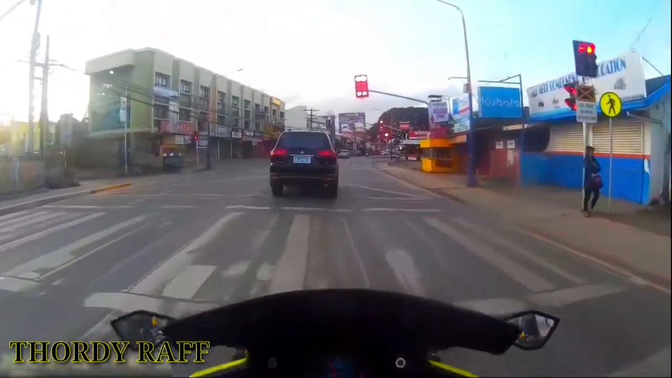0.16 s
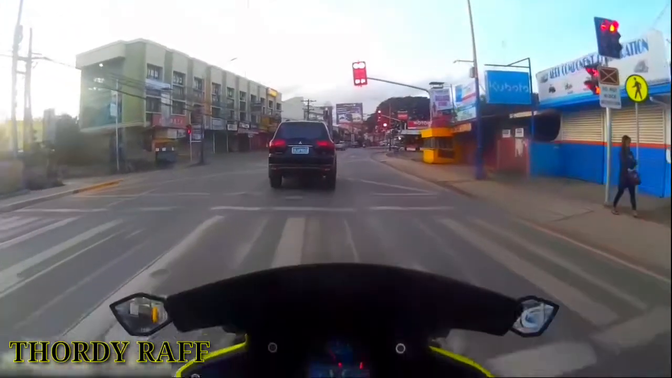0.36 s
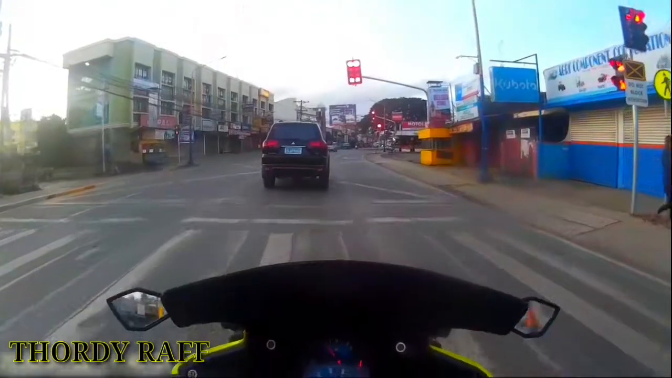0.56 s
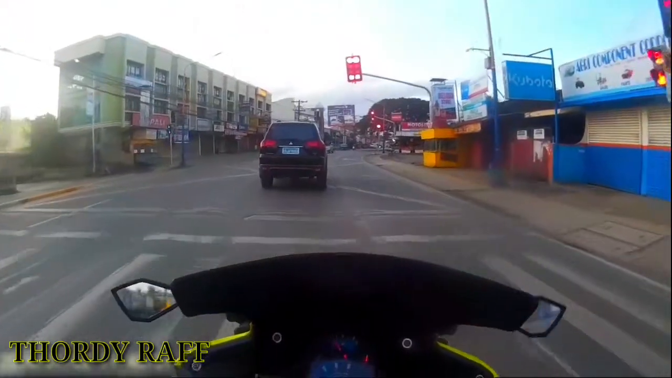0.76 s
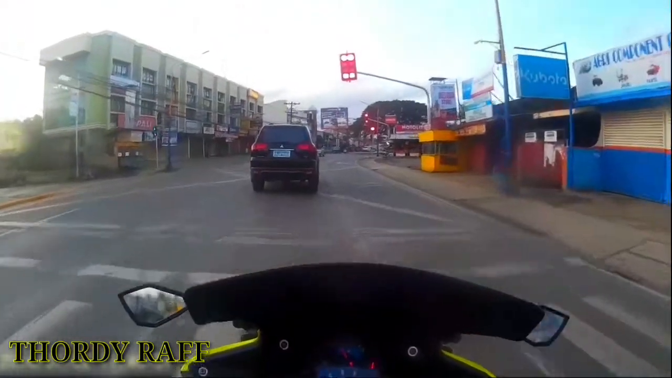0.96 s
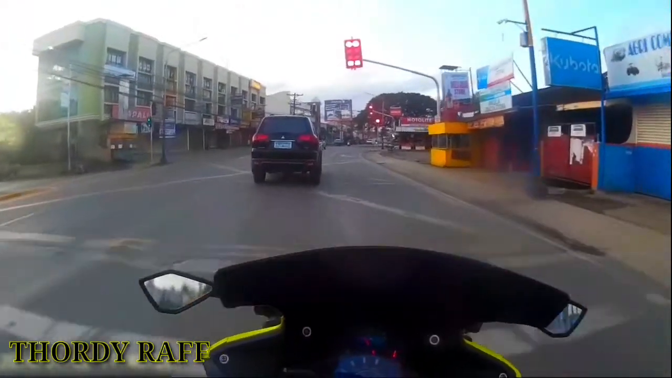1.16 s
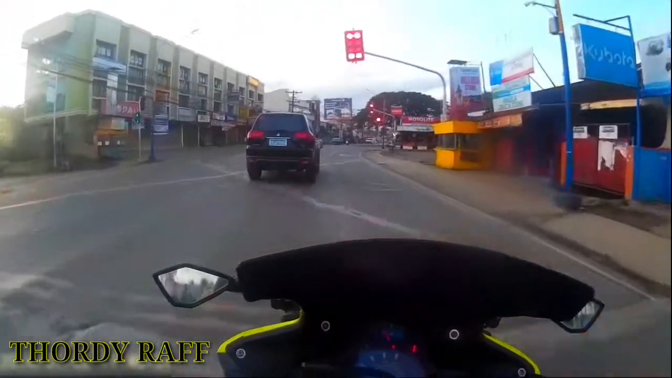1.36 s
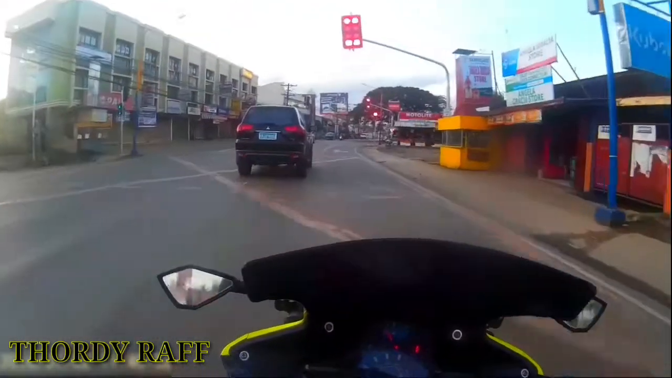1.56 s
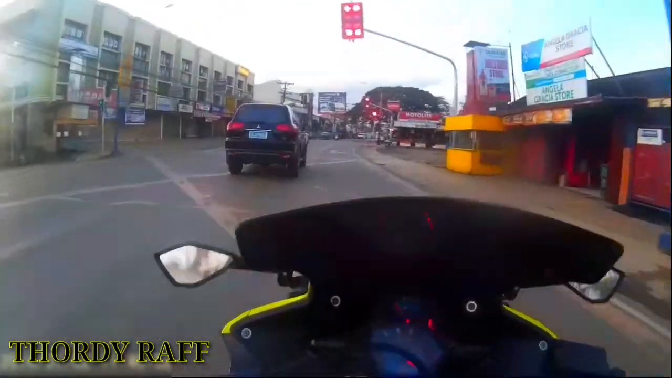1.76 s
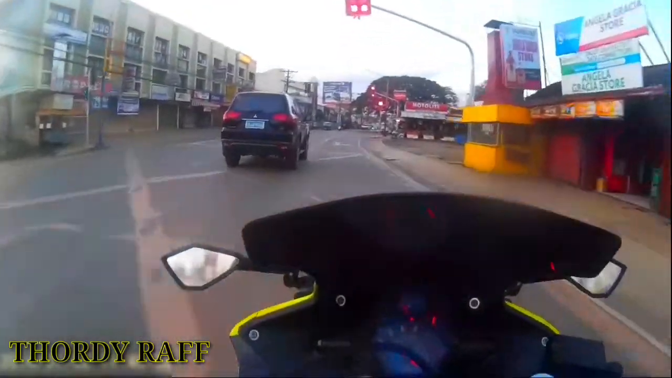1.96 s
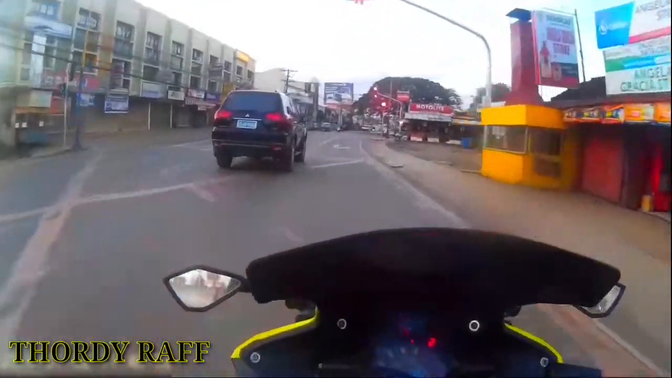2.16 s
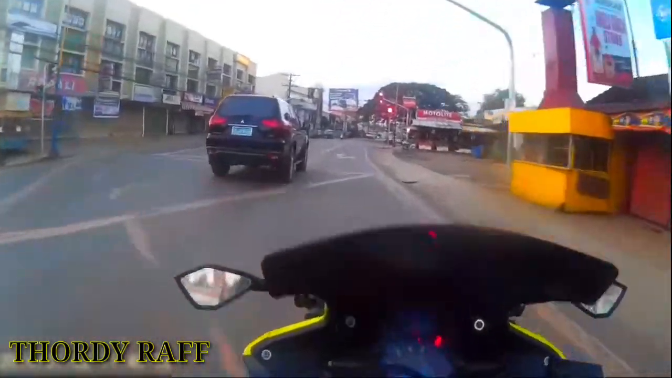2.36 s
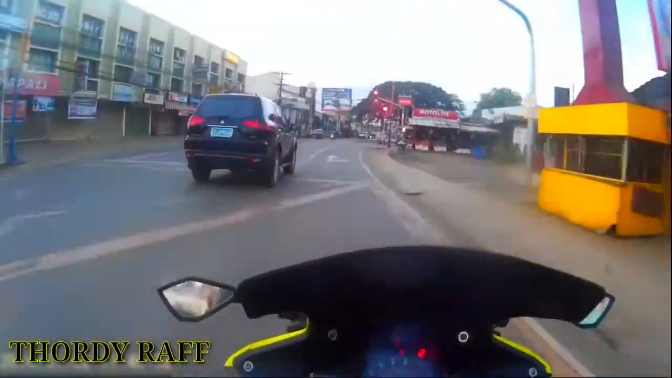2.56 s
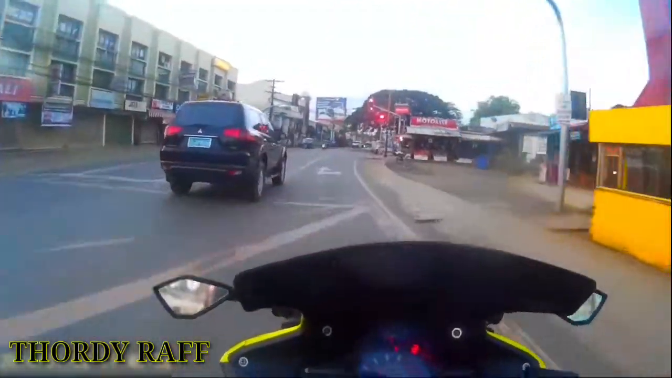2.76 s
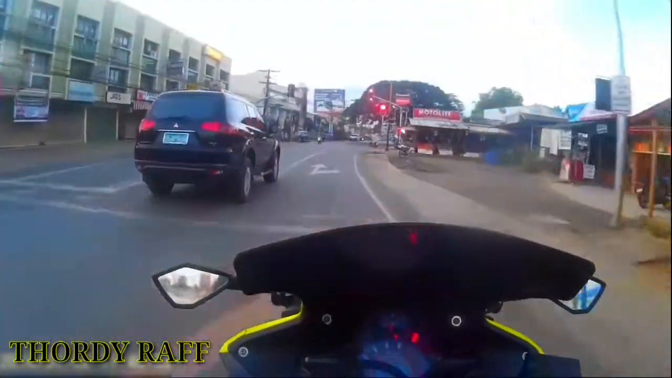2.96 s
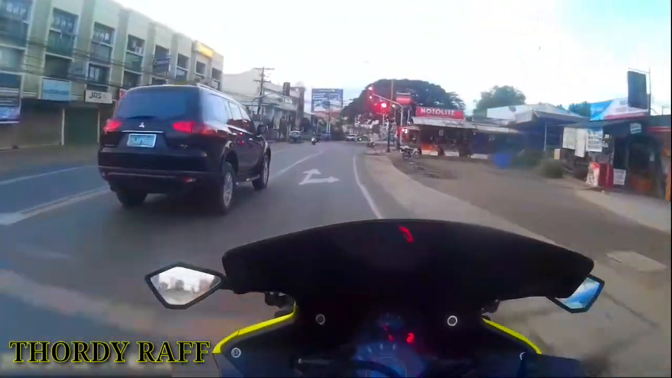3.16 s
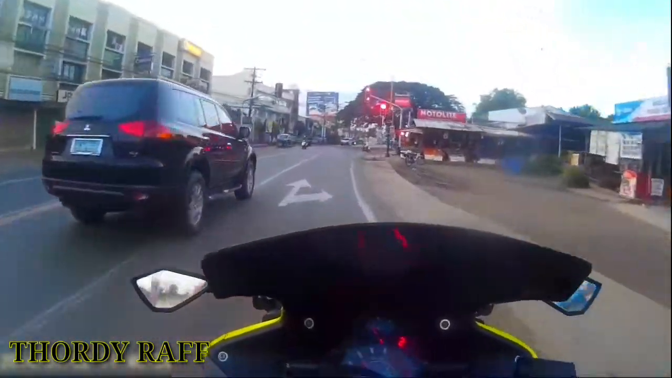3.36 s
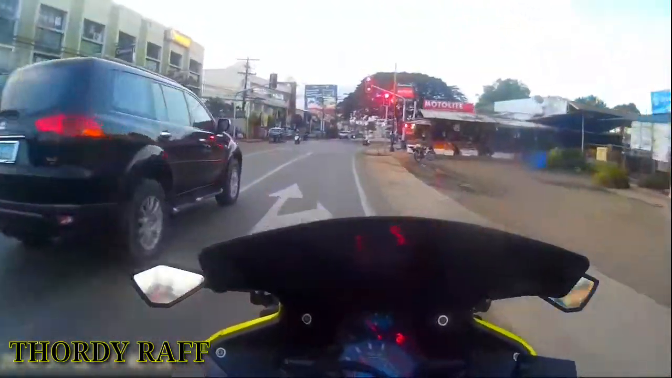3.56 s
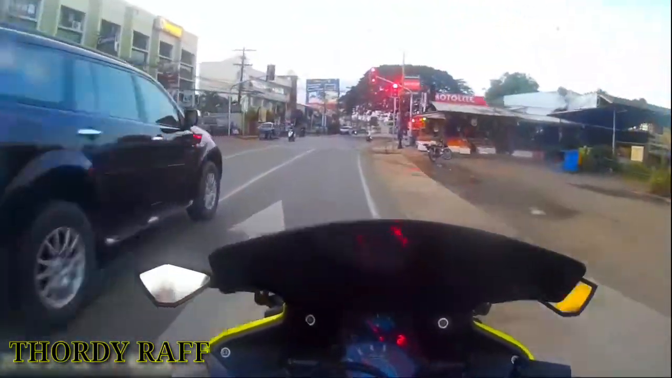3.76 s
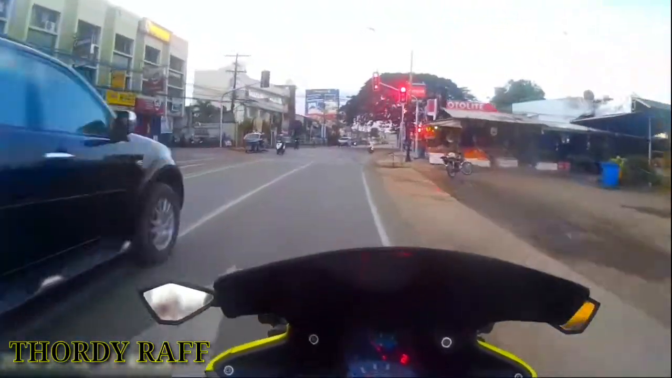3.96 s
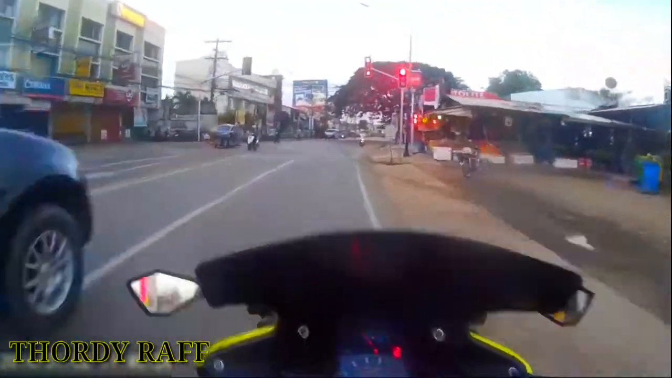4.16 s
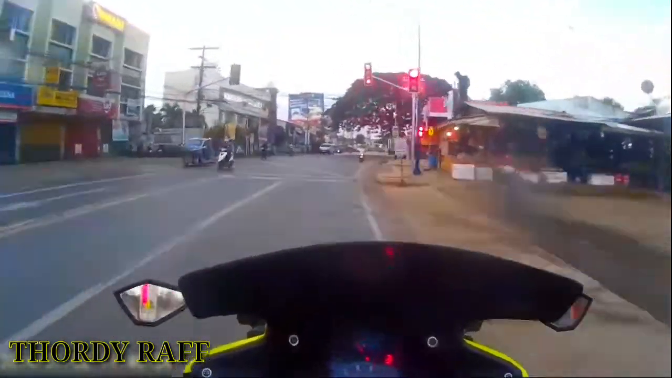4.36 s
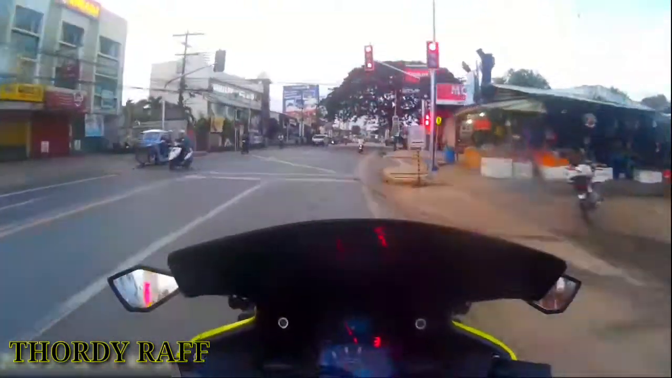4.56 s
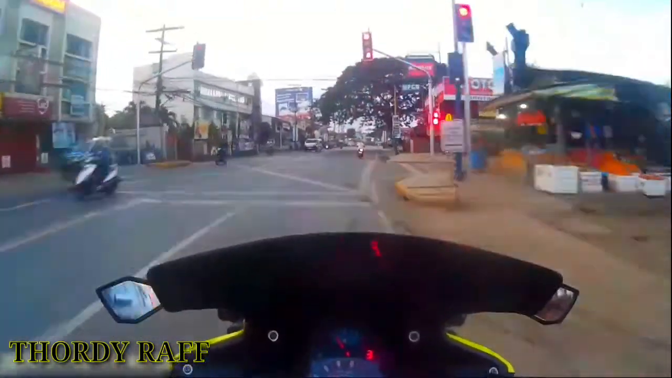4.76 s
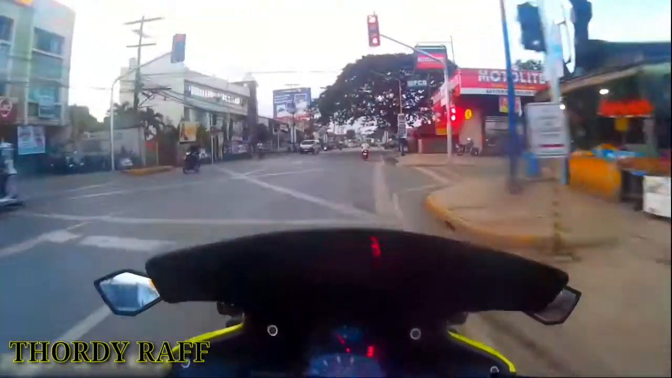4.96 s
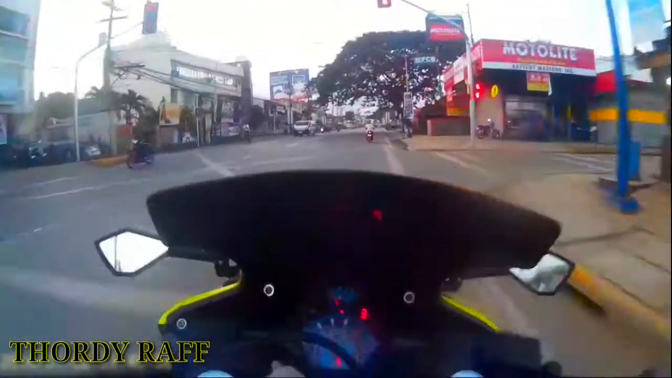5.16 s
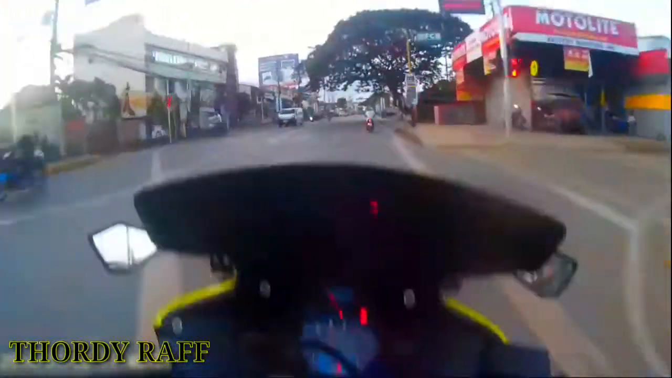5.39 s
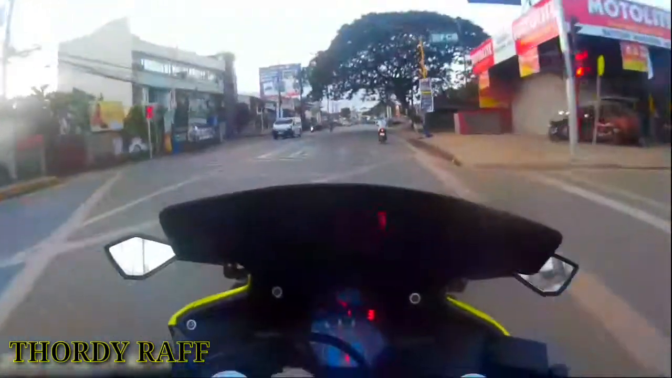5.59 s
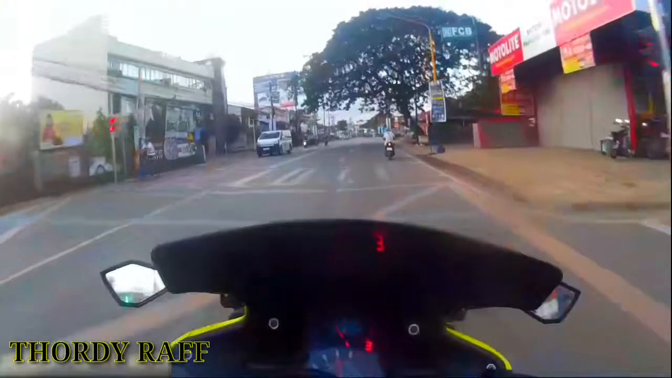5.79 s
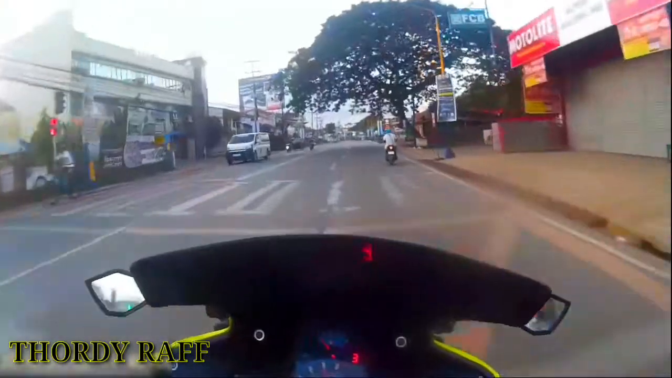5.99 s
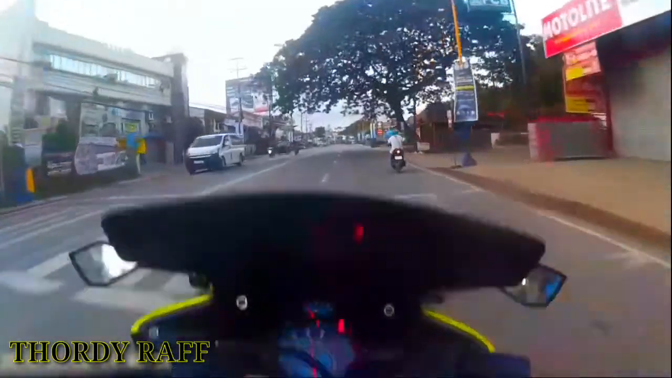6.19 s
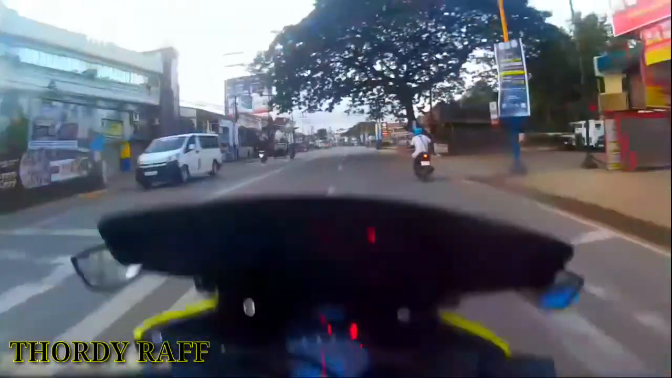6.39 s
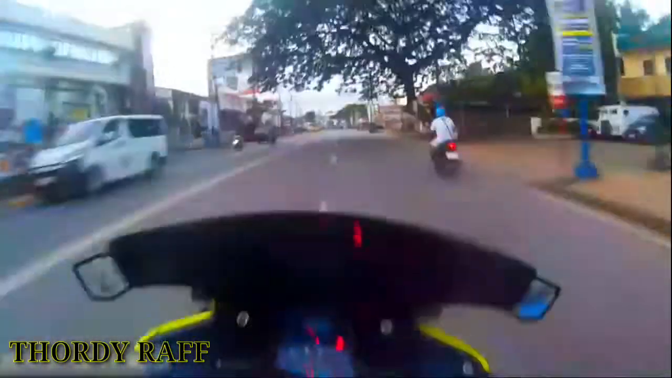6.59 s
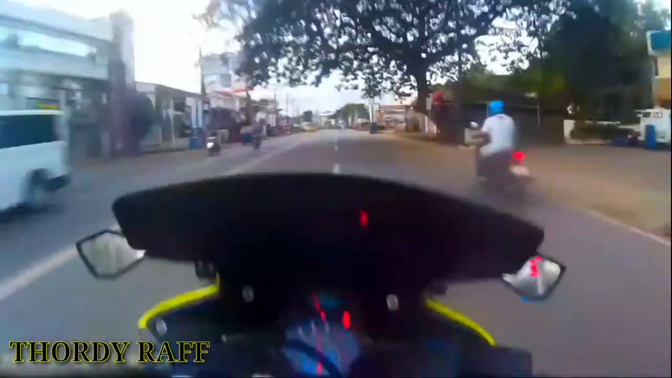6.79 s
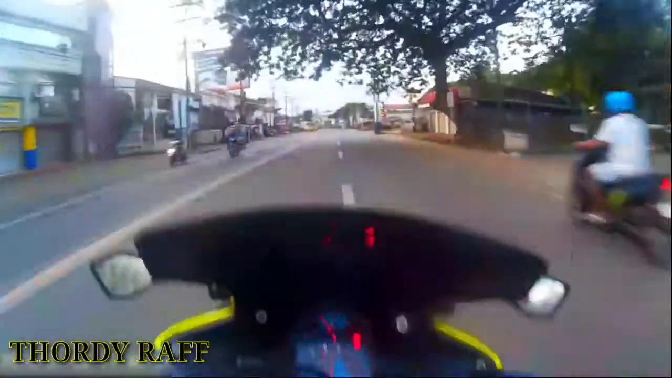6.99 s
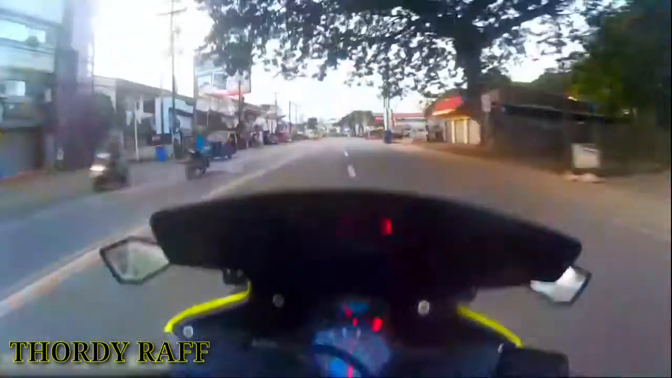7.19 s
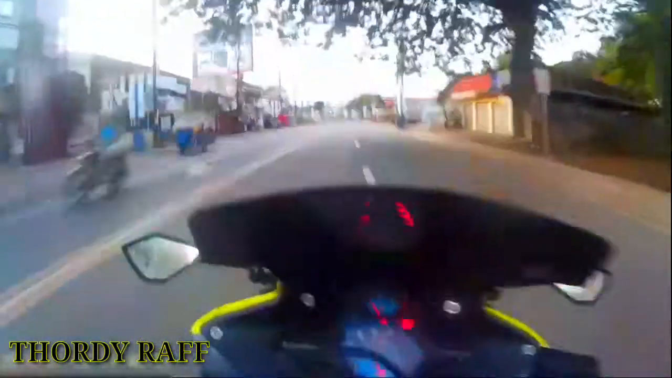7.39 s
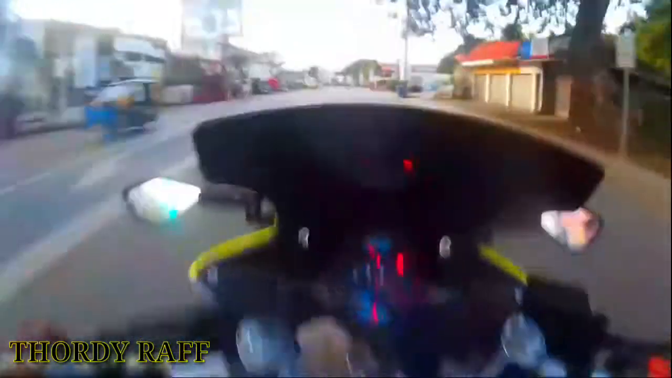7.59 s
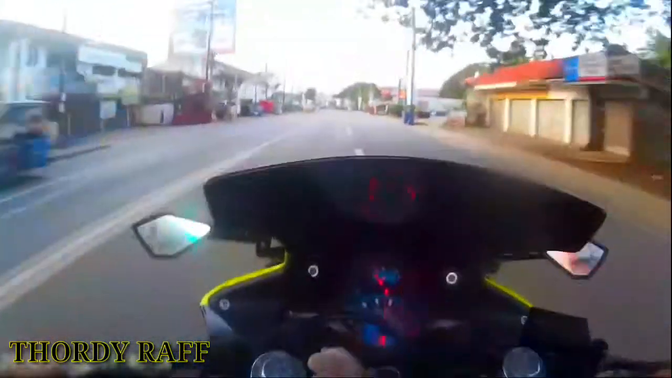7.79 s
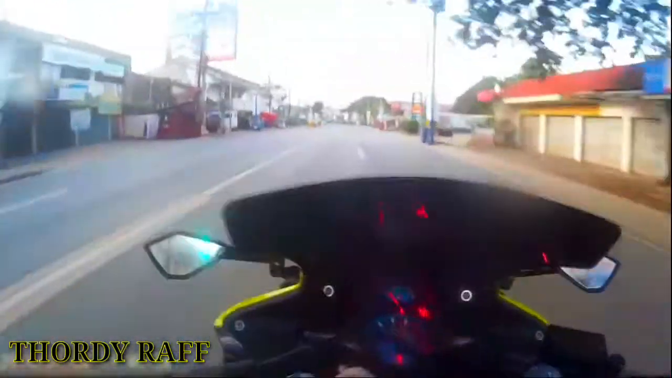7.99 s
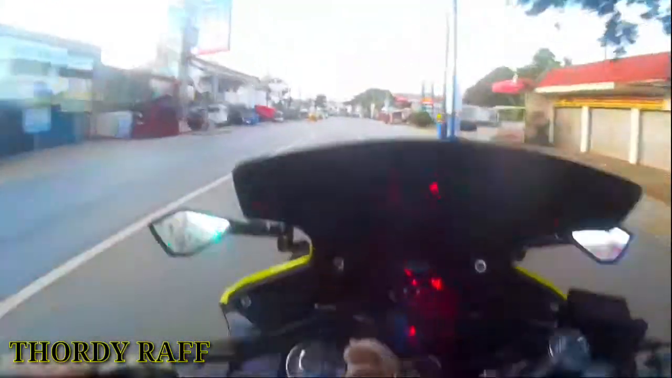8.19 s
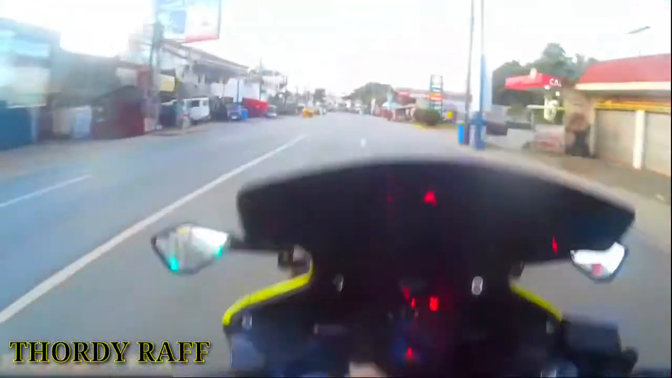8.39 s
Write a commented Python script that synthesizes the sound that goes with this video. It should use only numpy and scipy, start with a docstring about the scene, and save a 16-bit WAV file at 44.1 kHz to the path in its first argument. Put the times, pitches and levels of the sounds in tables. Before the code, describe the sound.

Onboard motorcycle ride outdoors: quiet hiss and low engine at first, then a swift swelling pull, a brief throttle cut, another climb, a second shift, and a longer slower climb before a last quick shift. The enclosed microphone makes the motor buzzy, nasal and muffled, while lumpy wind rumble and sudden bassy bumps grow towards the end.

```python
"""On the road: a single-cylinder motorcycle pulls away and shifts up through the gears.
It is heard through a camera in a case on the rider. Each firing thumps as a sum of exhaust tones;
the crank hums, and noise bursts and overtones rattle the case, which rings at fixed pitches.
Wind is low, lumpy noise that grows along the ride, with sudden slaps; the recorder adds a soft hiss."""
import sys
import numpy as np
from scipy import signal
from scipy.fft import rfft, irfft, next_fast_len
from scipy.io import wavfile
from scipy.ndimage import uniform_filter1d

SR = 44100
rng = np.random.default_rng(int(sys.argv[2]) if len(sys.argv) > 2 else 0)


def transcribe(u):
    """Save the signal u as a 16-bit wav file named by the first command-line argument.

    u: samples, shape (n,) or (channels, n), limited to [-1, 1]; the rate is SR.
    q: integer samples, one column per channel.
    """
    v = np.clip(np.atleast_2d(u).T, -1, 1)
    q = np.round(v * 32767).astype(np.int16)
    wavfile.write(sys.argv[1], SR, q)


N = 372204  # length in samples

# Strength of the wind, which grows with road speed: t/s, relative level/dB
WIND_STRENGTH = [(0.0, -46.5), (0.8, -47), (1.15, -44.5), (2.1, -43), (2.9, -40), (3.4, -37), (4.2, -34),
                 (4.95, -32), (5.3, -29), (5.65, -32), (6.3, -30), (7.0, -26.5), (7.6, -27.5),
                 (7.85, -23.5), (8.05, -30), (8.44, -27.5)]
RIDE_MIDDLE_S = 5.2  # slow changes of tone along the ride are neutral here


def gain_of(db):
    """Turns decibels into a factor for the signal."""
    return 10 ** (np.asarray(db) / 20)


def evened(x):
    """Scales a signal to an average strength (rms) of 1."""
    return x / np.sqrt(np.mean(x ** 2) + 1e-20)


def read(points, hz):
    """Reads a curve over frequency, with straight lines on a logarithmic pitch scale."""
    f, value = np.transpose(points)
    return np.interp(np.log(hz + 1), np.log(f + 1), value)


def columns(rows):
    """Turns each column of a table over time into one value per sample."""
    s, *values = np.transpose(rows)
    return [np.interp(np.arange(N) / SR, s, v) for v in values]


def coloured(x, gain):
    """Filters x by a gain given as a function of Hz."""
    size = next_fast_len(N + 8192)
    spectrum = rfft(x, size) * gain(np.fft.rfftfreq(size, 1 / SR))
    return irfft(spectrum, size)[:N]


def drift(hz):
    """Random wandering of rms 1, with changes mostly slower than hz."""
    noise = rng.standard_normal(N)
    return evened(coloured(noise, lambda f: (f > .5) / (1 + (f / hz) ** 4)))


def per_firing(turns):
    """One random number for each firing, joined by straight lines."""
    draws = rng.standard_normal(1000)
    return np.interp(turns, np.arange(len(draws)), draws)


def overtones(turns, orders, gain, late, waver_db):
    """Adds multiples of the firing rate, each with a gain curve, a lag in radians and its own slow wavering."""
    n, out = np.arange(N), np.zeros(N)
    coarse = n[::64]  # the curves are worked out at every 64th sample
    for k in orders:
        # a new random level every 8 firings
        waver = np.interp(turns[::64] / 8, np.arange(300), rng.standard_normal(300))
        size = np.interp(n, coarse, gain(k) * gain_of(waver_db * waver))
        lag = np.interp(n, coarse, late(k))
        out += size * np.cos(2 * np.pi * k * turns - lag)
    return np.sqrt(2) * out


def recorder_hiss(dry):
    """Shaped noise; gain control presses it down a little when the scene is loud."""
    # Tone of the hiss: f/Hz, relative level/dB per Hz
    hiss_tone = [(1470, -24), (2500, -1.5), (3470, -3.5), (5070, -3.5), (6560, -2.5), (8560, -4),
                 (11400, -2.5), (13400, -5.5), (15400, -21)]
    hiss = gain_of(-55) * evened(coloured(rng.standard_normal(N), lambda f: gain_of(read(hiss_tone, f))))
    power_db = 10 * np.log10(uniform_filter1d(dry[0] ** 2, 8000) + 1e-12)
    pressed_db = .1 * np.maximum(power_db + 44.0, 0)
    return hiss * gain_of(0.2 * drift(12) - pressed_db)


def wind_rumble():
    """Low turbulence: filtered noise whose strength wanders, so it comes in lumps."""
    # Tone of the wind: f/Hz, relative level/dB per Hz
    wind_tone = [(20, 15), (30, -13.5), (45, 4), (62, 10), (85, 3.5), (120, 3.5), (160, -2), (250, -4.5),
                 (450, -6), (700, -74)]
    level_db, = columns(WIND_STRENGTH)
    lumps = rng.standard_normal(N) * gain_of(0.26 * drift(38) + 0.34 * drift(5.2))
    return gain_of(level_db + 2.5) * evened(coloured(lumps, lambda f: gain_of(read(wind_tone, f))))


def slaps():
    """Hard gusts and jolts slap the microphone: each is a low thud with a puff of noise."""
    # The slaps: t/s, level of the thud/dB, f/Hz
    slap_list = [(5.123, -22, 59.7), (5.399, -22, 92.4), (5.439, -22.5, 44.9), (5.799, -27, 61.5),
                 (6.119, -30, 92.4), (6.34, -18.5, 56.64), (6.37, -22, 59.96), (6.729, -28, 117.5),
                 (7.449, -21, 70.2), (7.549, -20, 80), (7.693, -23, 84.04), (7.859, -22.5, 61.5),
                 (8.219, -26, 124)]
    peak_s = 0.013  # a slap swells until this time, then fades
    out = np.zeros(N)
    t = np.arange(round(.15 * SR)) / SR
    low_pass = signal.butter(4, 900, fs=SR, output="sos")
    puffs = evened(signal.sosfilt(low_pass, rng.standard_normal((len(slap_list), len(t)))))
    for (s, db, hz), puff in zip(slap_list, puffs):
        swell = (t / peak_s) * np.exp(1 - t / peak_s)
        slap = gain_of(db) * (np.sin(2 * np.pi * hz * t) + 0.27 * puff) * swell
        part = out[round(s * SR):][:len(t)]
        part += slap[:len(part)]
    return out


def throttle_shut():
    """Gear changes: 1 while the throttle is shut, 0 under power, with ramps between."""
    # The gear changes: throttle starts to shut at t/s, stays shut for/s, reopens over/s
    shifts = [(2.035, 0.11, 0.18), (4.115, .07, 0.075), (7.79, 0.034, 0.058)]
    close_s = 0.017
    t = np.arange(N) / SR
    return sum(np.interp(t - s, [0, close_s, close_s + hold, close_s + hold + reopen], [0, 1, 1, 0])
               for s, hold, reopen in shifts)


def flares():
    """The rear wheel skips and the engine flares: extra speed and clatter, each flare a short bell curve."""
    # Flares over bumps: t/s, extra firing rate f/Hz, extra clatter level/dB
    flare_list = [(1.74, 0.57, 2), (4.56, 0.91, 1.5), (5.28, 3.1, 3.5), (6.37, 4.62, 5)]
    t = np.arange(N) / SR
    return sum(np.outer([hz, db], np.exp(-((t - s) / .045) ** 2)) for s, hz, db in flare_list)


def case_gain(hz):
    """The camera case rings at fixed pitches; the powers of its steep-sided resonances add."""
    # Resonances of the case: f/Hz, width/Hz, level/dB
    resonances = [(304, 210, 2.5), (566, 300, 3.5), (620, 40, 6), (776, 170, 6), (998, 150, 3.5),
                  (1114, 154, 5.5), (1290, 177, 7.5), (1628, 140, -0.5), (1790, 570, -11), (2087, 250, 0.5),
                  (2612, 310, -15.5), (2960, 204, -10.5), (3336, 266, -9), (3732, 310, -17),
                  (4060, 3700, -28.5), (7600, 1500, -32.5)]
    return np.sqrt(sum((gain_of(db) / (1 + (2 * (hz - f) / width) ** 2)) ** 2
                       for f, width, db in resonances))


def clatter(turns, hz, level_db):
    """Noise that bursts at each firing and, weaker, one crank turn later, ringing the case."""
    # Share of noise in the rattle, less where the overtones rule: f/Hz, level/dB
    noise_share = [(400, -4.5), (600, -7.5), (900, -4.5), (1300, -2), (1800, 1.5), (4000, -0.5)]
    phase = turns + .17  # the knock leads the exhaust pulse by this share of a cycle
    burst = np.exp(-(phase % 1) / 0.097) + 0.61 * np.exp(-((phase + .5) % 1) / 0.51)
    noise = rng.standard_normal(N) * (1 + 1.3 * burst * gain_of(1.8 * per_firing(turns)))
    ring = evened(coloured(noise, lambda f: case_gain(f) * gain_of(read(noise_share, f))))
    # the top brightens with engine speed (dB per Hz) and dulls along the ride (dB per second)
    top = coloured(ring, lambda f: np.clip((f - 2300) / 300, 0, 1) * np.clip((5000 - f) / 800, 0, 1))
    bite_db = 0.1849 * (hz - 56.5) - .5 * (np.arange(N) / SR - RIDE_MIDDLE_S)
    ring = ring + (gain_of(bite_db) - 1) * top
    return gain_of(level_db - 2.0 + 0.33 * drift(14.0)) * ring


def buzz(turns, hz, level_db):
    """Firing knocks reach the case through the frame as overtones, firmer at speed."""
    # How firmly the frame passes the overtones to the case: f/Hz, level/dB
    mount = [(450, -1), (650, -2), (790, 3), (900, -0.7), (1250, 0.5), (2100, -1.3)]
    loose = rng.standard_normal((40, 100))  # the frame shifts each overtone slowly

    def strength(k):
        overtone_hz = k * hz[::64]
        odd_db = -2.5 * (k % 2)  # even multiples, the overtones of the crank turn, are stronger
        return case_gain(overtone_hz) * gain_of(odd_db + read(mount, overtone_hz))

    def lag(k):
        return 1.5 * np.interp(turns[::64] / 36, np.arange(100), loose[k])

    out = overtones(turns, range(8, 40), strength, lag, waver_db=3.2)
    # buffeting loosens the mount, so strong wind weakens the buzz
    wind_db = uniform_filter1d(columns(WIND_STRENGTH)[0], SR // 2)
    shaken_db = .25 * np.maximum(wind_db + 40, 0)
    firmer_db = np.clip(.4 * (hz - 56), -10, 0)
    return gain_of(level_db - shaken_db + firmer_db) * evened(out)


def crank_levels(hz, level_db, shut):
    """The crank's hum and its octave follow the clatter, coloured by the frame, each wavering."""
    # How strongly the frame carries the hum: f/Hz, level/dB
    frame_hum = [(56, -18), (68, -5), (79, 0.5), (92, -6), (104, -4), (115, -6.5), (128, -8.5)]
    # How strongly the frame carries the octave: f/Hz, level/dB
    frame_octave = [(112, -14), (135, -5), (157, -4), (180, -8), (205, -3), (225, 0.5), (258, 0)]
    # How far the crank's tones stand out along the ride: t/s, hum level/dB, octave level/dB
    crank_balance = [(0.0, 3.5, -0.3), (2.1, 1, 0.6), (3.0, .1, 0.1), (4.4, -1.5, -0.5), (5.8, -3, -1.5),
                     (6.8, 5.5, -3), (8.44, -1.5, -4)]
    waver_db = 1.5
    hum_db, octave_db = columns(crank_balance)
    hum_db = hum_db + read(frame_hum, 2 * hz) - 8.0 * shut + waver_db * drift(8.3)
    octave_db = octave_db + read(frame_octave, 4 * hz) - 4.5 * shut + waver_db * drift(6.0)
    return level_db + hum_db, level_db + octave_db


def crank(turns, hum_db, octave_db):
    """The crank turns twice per firing and hums on, more softly, when the throttle is shut."""
    hum = -gain_of(hum_db) * np.sin(2 * np.pi * 2 * turns)
    octave = -gain_of(octave_db) * np.cos(2 * np.pi * 4 * turns)
    return np.sqrt(2) * (hum + octave)


def exhaust(turns, hz, level_db):
    """A steady pulse per firing, weighted by the pipe, which delays tones unevenly around its middle."""
    # What the exhaust pipe lets through: f/Hz, level/dB
    pipe = [(30, -36), (70, -39), (150, 11.5), (220, -4.5), (270, 7.5), (320, 5), (380, 7), (430, 4.5),
            (455, -17), (490, -14), (560, -8.5)]
    # The pulse, uneven as intake and exhaust beat in turn: multiple of the firing rate, level/dB
    pulse = [(1, -24), (3, -25.5), (5, -8), (6, -1.5), (7, 0), (8, -3.5), (9, -4), (10, -7), (11, -23),
             (12, -19.5), (13, -18.5)]
    share_db = {round(k): db for k, db in pulse}
    hz = hz[::64]
    # odd multiples run ahead by lead radians: a weaker beat between two firings, more so at speed
    lead = np.clip(.45 + .045 * (hz - 46), .45, 1.1)
    # the upper multiples gain strength along the ride, in dB per multiple
    tilt_db = 0.67 * (np.arange(0, N, 64) / SR - RIDE_MIDDLE_S)

    def strength(k):
        steps = min(max(k - 6, -2), 2)
        return gain_of(share_db[k] + read(pipe, k * hz) + tilt_db * steps)

    def lag(k):
        return .2 * ((k * hz - 300) / 60) ** 2 - lead * (k % 2)

    out = overtones(turns, share_db, strength, lag, waver_db=0.0)
    return -gain_of(level_db + .4 * per_firing(turns)) * out  # each pulse arrives as a suction


def scene():
    """Adds wind and engine at one microphone; all engine parts share one count of firings."""
    # Pulls and drops between gears: t/s, firing rate f/Hz, relative exhaust level/dB, clatter level/dB
    engine_course = [(0.0, 28.4, -69, -53), (0.73, 39.18, -56, -51.5), (1.01, 44.73, -53.5, -48.5),
                     (1.36, 50.94, -46, -43), (1.5, 53.8, -40.5, -38), (1.62, 55.94, -40.5, -38.5),
                     (1.76, 60.33, -39.5, -37), (2.04, 63.7, -35.5, -32.5), (2.18, 53.5, -32, -39),
                     (2.31, 44.26, -45.5, -43), (2.7, 48.24, -43, -41), (3.0, 51.57, -44, -39.5),
                     (3.2, 54.1, -38, -37.5), (3.67, 59.35, -37, -33), (4.11, 64.28, -34.5, -29),
                     (4.2, 61.9, -38.5, -33), (4.51, 46.48, -39.5, -36.5), (4.75, 48.21, -40.5, -37.5),
                     (5.2, 51.06, -40, -37), (5.43, 52.52, -38.5, -34.5), (6.02, 56.04, -37.5, -34),
                     (6.53, 58.19, -37.5, -32), (7.29, 61.53, -37, -27.5), (7.76, 62.9, -33.5, -25.5),
                     (7.83, 60.28, -44, -26.5), (7.9, 61.65, -39, -29), (8.09, 53.76, -40, -33),
                     (8.44, 54.5, -39.5, -32)]
    hz, exhaust_db, clatter_db = columns(engine_course)
    shut = throttle_shut()
    flare_hz, flare_db = flares()
    hz, clatter_db = hz + flare_hz, clatter_db + flare_db
    turns = np.cumsum(hz * (1 + .001 * drift(10))) / SR  # firings so far, at a slightly unsteady speed
    hum_db, octave_db = crank_levels(hz, clatter_db, shut)
    rattle_db = clatter_db - 0.5 * shut
    air = wind_rumble() + slaps()
    rattle = clatter(turns, hz, rattle_db) + buzz(turns, hz, rattle_db - 5.5 * shut)
    engine = crank(turns, hum_db, octave_db) + exhaust(turns, hz, exhaust_db - 27.5 * shut)
    return (air + rattle + engine)[None]


def record(dry):
    """The microphone drops the deepest bass, hiss joins, and a filter cuts off the highest treble."""
    dry = signal.sosfilt(signal.butter(2, 26, "high", fs=SR, output="sos"), dry)
    band_limit = signal.firwin(511, 15480, window=("kaiser", 9), fs=SR)
    return signal.oaconvolve(dry + recorder_hiss(dry), band_limit[None], "same")


dry = scene()
out = record(dry)
transcribe(out)
```